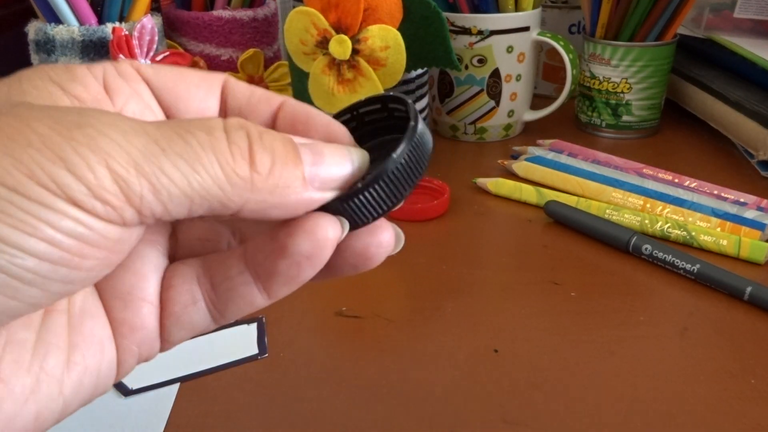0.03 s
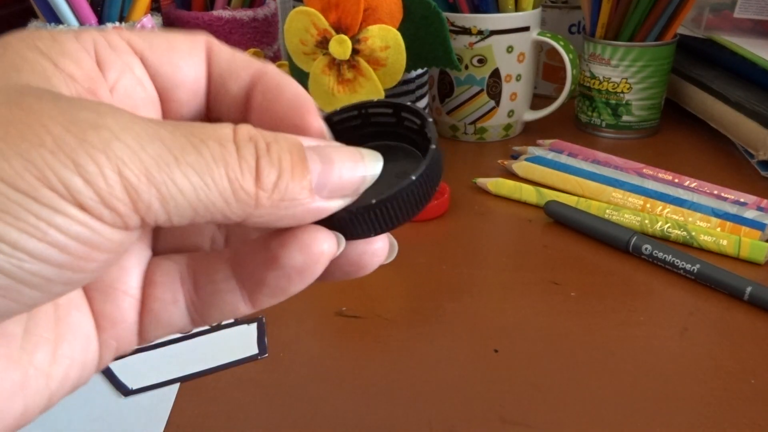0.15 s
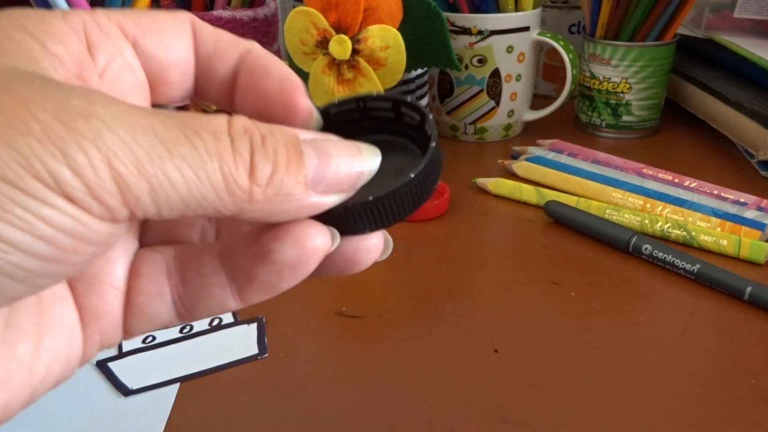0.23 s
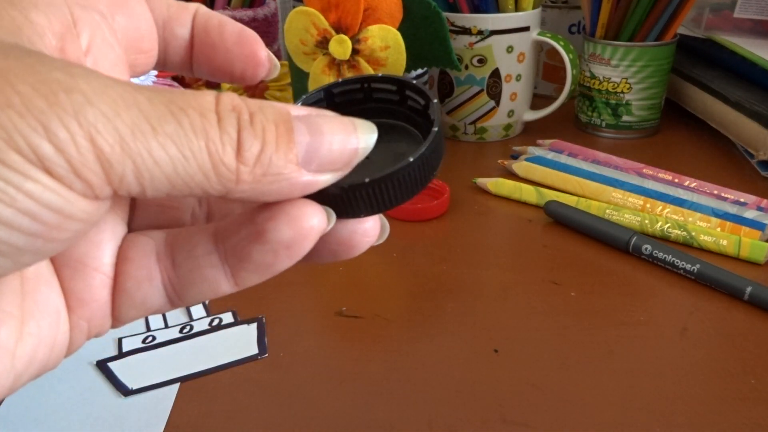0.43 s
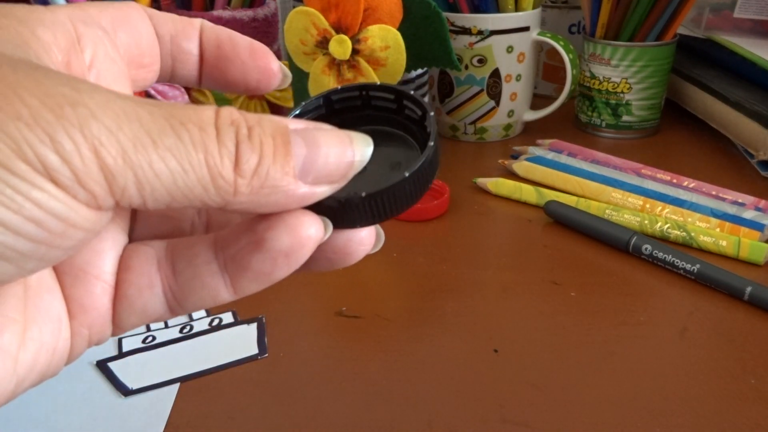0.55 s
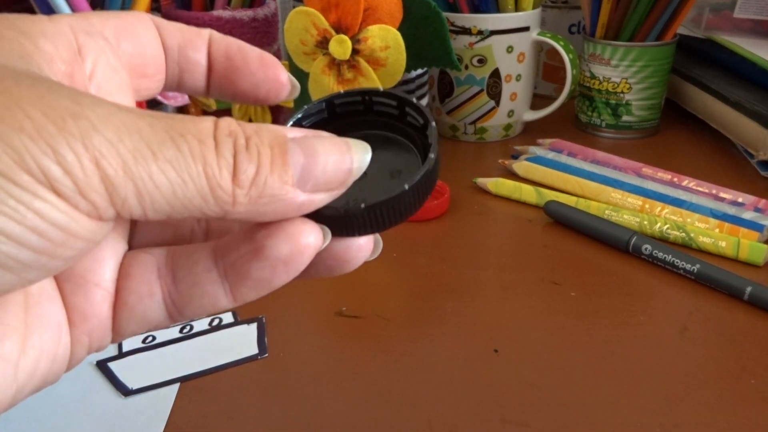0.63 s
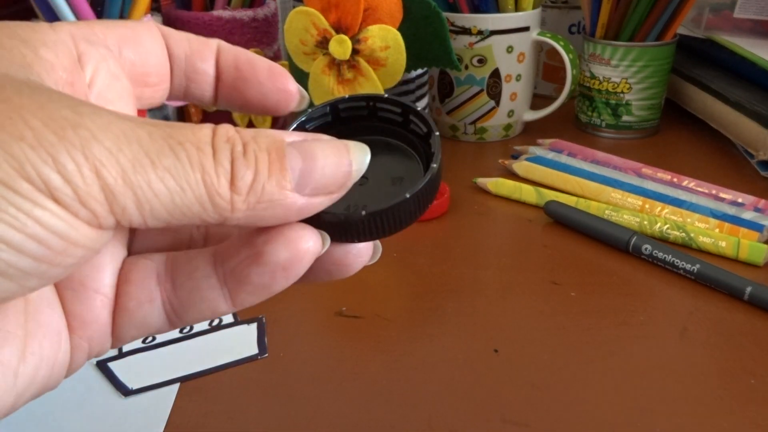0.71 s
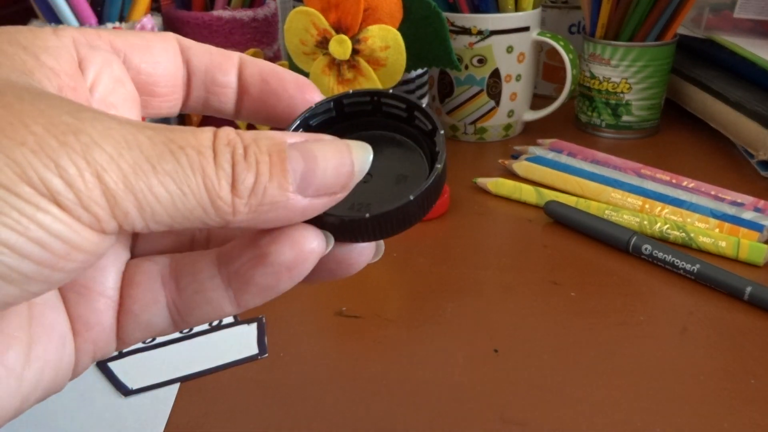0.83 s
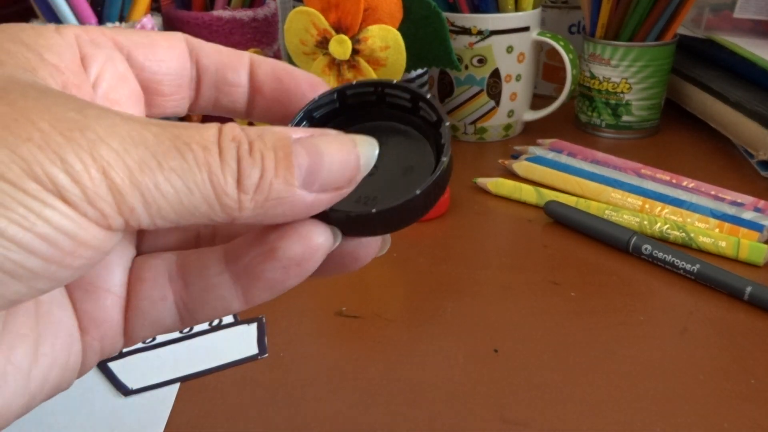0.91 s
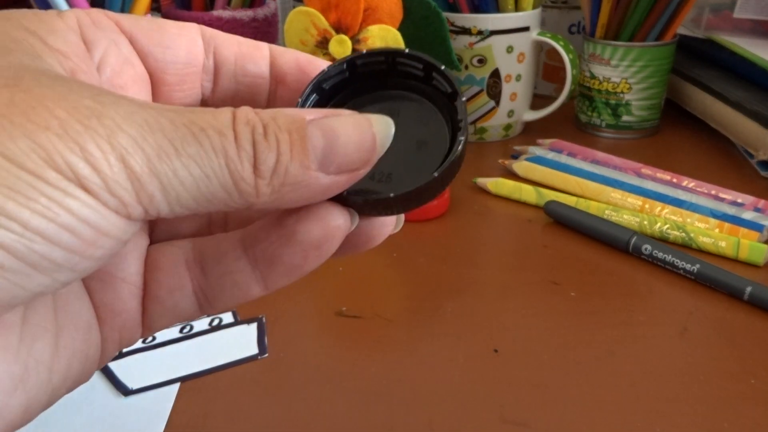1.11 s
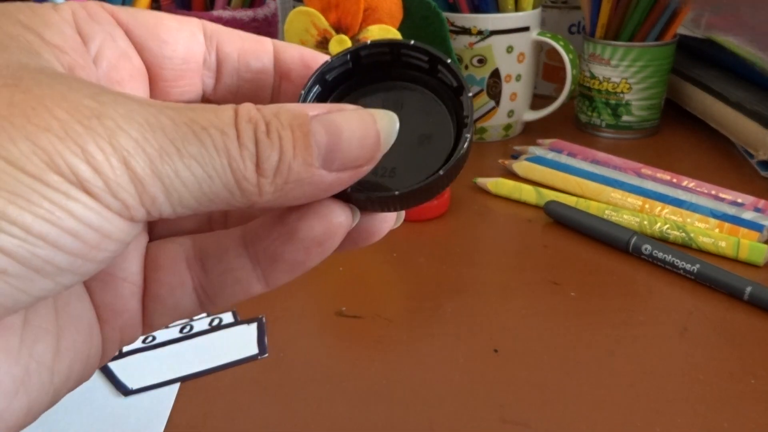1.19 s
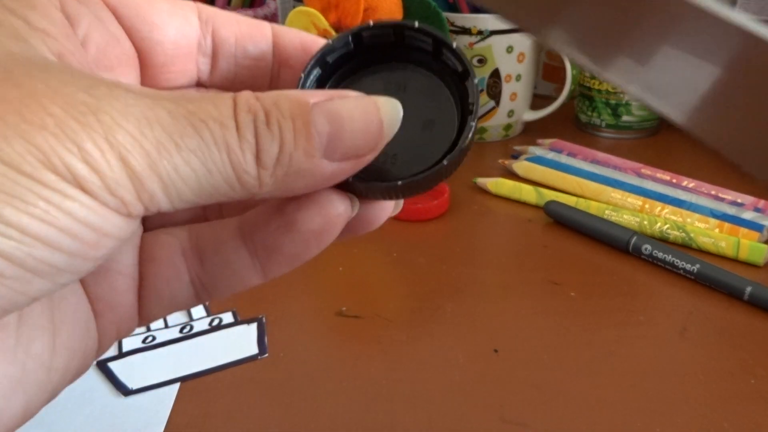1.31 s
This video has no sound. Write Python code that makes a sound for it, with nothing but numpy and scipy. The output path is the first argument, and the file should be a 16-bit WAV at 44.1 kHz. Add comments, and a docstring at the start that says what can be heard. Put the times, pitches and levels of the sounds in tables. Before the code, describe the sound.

Close up in a small quiet room, fingers brush plastic, caps click together and rattle with growing force, knock hollowly on a wooden desktop, then settle, leaving low hiss and a faint rub.

```python
"""Plastic bottle caps are picked from a heap on a wooden desk, tick against each other and tumble back.
Each knock is a short rough push that rings desk and cap modes, with a smooth hollow note struck by one tap.
Random small contacts rattle under and between the knocks; fingers rub softly (shaped noise), the desk top
hums (wandering sine), a small room answers (decaying noise). Room hiss and a thin electrical whine lie underneath."""
import sys
import numpy as np
from scipy import signal
from scipy.fft import rfft, irfft
from scipy.io import wavfile
from scipy.ndimage import uniform_filter1d

SR = 44100
rng = np.random.default_rng(int(sys.argv[2]) if len(sys.argv) > 2 else 0)


def output_pcm(signal):
    """Save a mono or channel-first signal as 16-bit PCM at the path in sys.argv[1].

    Samples are clipped to [-1, 1] before scaling.
    """
    pcm = np.clip(np.atleast_2d(signal).T, -1, 1) * 32767
    wavfile.write(sys.argv[1], SR, np.round(pcm).astype(np.int16))


N = 59535
TIME_S = np.arange(N) / SR

# Steady hiss spectrum. Each row: frequency in Hz, relative density in dB per Hz.
HISS_TONE = [(24, -67), (40, -36.5), (180, -11.5), (330, -5), (800, 5), (1300, -3.5), (1580, 6.5),
             (1900, -4), (2440, 0), (3830, -11), (4460, -12), (8770, -9.5), (16000, -12.5)]
# Stereo likeness of the hiss. Each row: frequency in Hz, left-right correlation (-1 to 1).
HISS_LIKENESS = [(60, 0.12), (240, -0.19), (950, -0.56), (3770, 0.16), (15000, 0.95)]
# Finger rubs, one list per rub. Each row: time in seconds, level in dB.
RUB_LEVELS = [
    [(0, -47), (.022, -57.5), (.032, -55.5), (.075, -56), (.09, -75), (.122, -67), (.138, -53), (.155, -57),
     (.172, -46.5), (.195, -51.5), (.205, -68)],
    [(.935, -72), (.96, -54), (.985, -54.5), (1.015, -67), (1.045, -64), (1.072, -51.5), (1.1, -60),
     (1.125, -59.5), (1.155, -71.5), (1.21, -78), (1.24, -59.5), (1.265, -61), (1.295, -82)],
]
# Rub spectra, one list per rub. Each row: frequency in Hz, relative density in dB per Hz.
RUB_TONES = [
    [(1760, -38), (3000, -16), (6480, -14), (13800, 2.5), (16000, -2)],
    [(1760, -2), (3000, -1), (3520, -2.5), (11000, 2), (16000, -5.5)],
]
# Knocks. Each row: start in seconds, low, low-mid, high-mid and treble level in dB (energy over 5 ms,
# before the bass cut), contact decay in ms, ring share of the caps (0-1), pitch of the hollow note in Hz.
KNOCKS = [(0.0137, -89, -64, -78, -57, 0.2, 0, 864), (0.2, -38, -72, -61, -40, 2.4, 0.9, 870.0),
          (0.21, -59, -71, -68, -29, 2, 0, 990), (0.2376, -36.5, -51, -44.5, -38, 2.4, 0.93, 1086),
          (0.242, -32, -66, -41, -26, 2.6, 0.72, 955), (0.249, -40.5, -49.5, -42, -36.5, 1.1, 0.6, 1053),
          (0.2597, -61, -66.5, -72, -43, 3.7, 0.8, 1070), (0.345, -34.5, -42, -28.5, -27.5, 2, 0.84, 900),
          (0.354, -49, -51, -36, -49, 3.8, 0.92, 850), (0.3603, -43, -66.5, -38, -39, 1.6, 0.85, 1130),
          (0.373, -48, -44, -33.5, -59, 1.6, 0.84, 1240), (0.4264, -46.5, -51, -49.5, -51, 0.5, 0.7, 1020),
          (0.447, -64.5, -56, -52.5, -45, 1, 0.4, 1040), (0.4884, -35.5, -40, -33.5, -36, 2.4, 0.7, 926),
          (0.5, -35, -35, -39.5, -74, 4.6, 1, 1042), (0.529, -33.5, -57.5, -53, -57.5, 1.7, 0.4, 990),
          (0.539, -48, -51, -59.5, -51, 3.1, 0.5, 1053), (0.5716, -37, -40.5, -61.5, -70, 4.6, 0.6, 938),
          (0.5904, -29.5, -31.5, -25, -62, 1.3, 0.07, 1027), (0.592, -28, -27.5, -68, -46, 7, 0.01, 1029),
          (0.611, -30, -33.5, -46, -63, 1.4, 0.3, 1053), (0.6209, -35, -60, -34.5, -35, 0.87, 0.67, 900),
          (0.6312, -29.5, -42, -28, -41, 2.3, 0.04, 974), (0.635, -26, -20, -22.5, -46, 1.22, 0.12, 1080),
          (0.644, -24, -32.5, -35, -28.5, 2.2, 0.09, 958), (0.6804, -17, -26, -28, -63, 2.6, 0.37, 916),
          (0.689, -43.5, -31.5, -35, -32, 0.92, 0.16, 870),
          (0.7077, -17.5, -49.5, -58, -55, 1.2, 0.85, 917),
          (0.719, -26.5, -19.5, -31, -31.0, 3.24, 0, 1053), (0.7233, -21, -23.5, -40.5, -67.5, 1.3, 0, 906),
          (0.772, -28.5, -39, -43.5, -72, 1.4, 0.6, 922), (0.7807, -33, -40, -62, -72, 2.9, 0.4, 1066),
          (0.788, -36, -45, -73, -77, 1.4, 0, 925), (0.812, -37, -75, -66, -76, 1.9, 0.2, 995),
          (0.828, -37.5, -59.5, -61.5, -77, 1.9, 0.4, 890), (0.873, -42.5, -59, -69.5, -69, 1.7, 0.5, 940),
          (0.906, -46, -57, -72.5, -76, 3.7, 0.1, 942)]
# Edges between the four bands, in Hz.
BAND_EDGES_HZ = [1400, 3000, 7000]
# Modes of desk and caps. Each row: frequency in Hz, level in dB relative within its band, t60 in seconds.
MODES = [(258.4, -26.5, 0.039), (363, -8, 0.052), (542, 3.5, 0.068), (627, 6, 0.098), (850, -14.5, 0.058),
         (1156, 6, 0.04), (1715, 5.5, 0.0089), (1840, 2.5, 0.04), (2455, -1.5, 0.034), (2720, 6.5, 0.0085),
         (3380, -15, 0.034), (3510, 11, 0.033), (4845, -6, 0.02), (5240, -8.5, 0.028), (6110, 5.5, 0.038),
         (6920, 5.5, 0.0079), (7580, 7, 0.0073), (8880, 8.5, 0.032), (9730, 10, 0.021), (12200, 5, 0.026),
         (13350, 16.5, 0.0062), (15000, 11.5, 0.03)]
# Upper limit on the mode t60 in each band, in seconds.
LONGEST_T60_S = [.045, .03, .024, .02]
# Room decay. Each row: frequency in Hz, t60 in seconds.
ROOM_T60 = [(200, 0.87), (500, 0.72), (1000, 0.3), (3700, 0.19), (9700, 0.22)]
# Desk panel's deep hum. Each row: time in seconds, RMS level in dB.
BOOM_LEVEL = [(0.19, -100), (0.21, -77), (0.25, -65), (0.3, -59.5), (0.34, -78), (0.38, -80), (0.42, -92),
              (0.57, -103), (0.6, -68.5), (0.65, -75), (0.7, -51.5), (0.74, -77), (0.77, -80),
              (0.82, -67.5), (0.86, -95), (0.9, -89)]
# Rattle of small contacts. Each row: time in seconds, then low, low-mid, high-mid and treble level in dB,
# all before the trim and the bass cut.
RATTLE_LEVELS = [(0.195, -73, -52, -57, -56), (0.203, -45, -60.0, -51, -67),
                 (0.236, -51.5, -67, -65, -66.5), (0.25, -35, -48.5, -44, -46.5),
                 (0.3, -99, -59, -60.5, -50.5), (0.342, -106, -65, -56.5, -62.5),
                 (0.35, -41.5, -58, -50, -33.5), (0.395, -62, -46, -43, -38.5),
                 (0.412, -52.5, -60, -61, -57), (0.44, -43.5, -55.5, -50.5, -48.5),
                 (0.465, -43.5, -36.5, -39, -38), (0.483, -40.5, -41, -57, -48),
                 (0.505, -47.5, -40, -36.5, -44.5), (0.525, -39.5, -70, -56, -52.5),
                 (0.555, -37, -59, -60, -62), (0.588, -40, -47, -57, -57.5),
                 (0.596, -41.5, -42, -40, -48.5), (0.627, -30, -29.5, -46, -54.5),
                 (0.64, -34.5, -25.5, -28, -28.5), (0.672, -29.5, -24, -31.5, -33.5),
                 (0.7, -49, -22.5, -35, -46.5), (0.735, -30, -29, -36.5, -45),
                 (0.755, -43, -28.5, -48, -45), (0.8, -53, -39.5, -51.5, -57),
                 (0.85, -54.5, -50.5, -61, -70.5), (0.9, -66.5, -56, -65, -73),
                 (0.93, -78, -57, -69, -73.5)]
# Caps ring freely in the hand, less in the heap. Each row: time in seconds, ring share (0-1).
RATTLE_RING = [(.52, .35), (.6, .05)]
# Where the heap sounds. Each row: time in seconds, left-right level difference in dB.
PAN = [(.3, -1.7), (.5, -2.7), (.7, -1.3), (0.901, 0.5)]

HISS_DB, WHINE_HZ, WHINE_PEAK_DB = -60, 15625, -79
RUB_LEAN_DB = -2  # left minus right
CRACK_LOW_HZ, CRACK_TOP_HZ = 570, 12260
CRACK_OVERLAP = 1.15  # each band's crack reaches into the next
CRACK_DULL_HZ = 1150  # above it the dry crack falls 6 dB an octave
CONTACT_RISE_S, DESK_RING_SHARE = 0.00028, 0.46
HOLLOW_SHARE = 0.68  # air in the cupped cap; its pitch follows how the cap lies
KNOCK_HOLLOW_WIDTH_HZ, RATTLE_HOLLOW_WIDTH_HZ = 115, 48
ROOM_DB, ROOM_LIKENESS, ROOM_DELAY_S = -10.5, 0.45, 0.004
BOOM_HZ, BOOM_WANDER_RMS_HZ = 109, 2.15
RATTLES_PER_S, RATTLE_SPREAD_DB, RATTLE_TRIM_DB = 3000, 2, -4.5
BASS_CUT_HZ, BAND_LIMIT_HZ = 278.5, 16000


def amp(db):
    """Decibels to amplitude factor."""
    return 10 ** (np.asarray(db) / 20)


def evened(x):
    """Scale to RMS 1."""
    return x / np.sqrt(np.mean(x ** 2) + 1e-20)


def read(points, hz):
    """Interpolate a frequency table on a log axis."""
    f, value = np.transpose(points)
    return np.interp(np.log(hz + 1), np.log(f + 1), value)


def over_time(points):
    """Interpolate a two-column time table at every sample."""
    return np.interp(TIME_S, *np.transpose(points))


def curve(table, column=1, off_db=-120):
    """Amplitude envelope from a dB column, at off_db outside the table's times."""
    rows = np.array(table)
    return amp(np.interp(TIME_S, rows[:, 0], rows[:, column], off_db, off_db))


def lean(db):
    """Left and right gains that differ by db."""
    return amp(np.array([[.5], [-.5]]) * db)


def blend(share, a, b):
    """Mix two signals by energy share."""
    share = np.clip(share, 0, 1)
    return np.sqrt(share) * a + np.sqrt(1 - share) * b


def correlated(a, b, likeness):
    """Two channels whose correlation is likeness, from independent a and b."""
    return np.array([a, likeness * a + np.sqrt(1 - likeness ** 2) * b])


def noise(tone, likeness):
    """Two-channel noise with the given spectrum and left-right likeness."""
    hz = np.fft.rfftfreq(N, 1 / SR)
    a, b = rfft(rng.standard_normal((2, N)))
    pair = correlated(a, b, np.clip(likeness(hz), -1, 1))
    return evened(irfft(pair * amp(read(tone, hz)), N))


def hiss_and_whine():
    """Room hiss as shaped noise, and a thin electrical whine as a steady sine."""
    whine = amp(WHINE_PEAK_DB) * np.sin(2 * np.pi * WHINE_HZ * TIME_S)
    return amp(HISS_DB) * noise(HISS_TONE, lambda hz: read(HISS_LIKENESS, hz)) + whine


def finger_rubs():
    """Skin sliding on plastic: soft treble hiss, alike in both channels."""
    rubs = [curve(level) * noise(tone, np.ones_like) for level, tone in zip(RUB_LEVELS, RUB_TONES)]
    return sum(rubs) * lean(RUB_LEAN_DB)


def hollow(push, hz, width_hz):
    """A resonance that follows the pitch hz; keeps the energy of white noise."""
    turn = np.exp(2j * np.pi * np.cumsum(hz * np.ones(len(push))) / SR)
    r = np.exp(-np.pi * width_hz / SR)
    # one-pole filter on the push shifted down by the pitch, then shifted back up
    ringing = turn * signal.lfilter([1], [1, -r], push / turn)
    return np.sqrt(2 * (1 - r * r)) * ringing.real


def bodies():
    """Per band: the decaying ring of its modes and a dry crack, each of energy 1."""
    t = np.arange(8192) / SR
    edges = [0, *BAND_EDGES_HZ, SR / 2]
    out = []
    for lo, hi, longest in zip(edges, edges[1:], LONGEST_T60_S):
        ring = sum(amp(db - 60 * t / min(t60, longest)) * np.sin(2 * np.pi * hz * t)
                   for hz, db, t60 in MODES if lo <= hz < hi)
        crack_band_hz = [max(lo, CRACK_LOW_HZ), min(hi * CRACK_OVERLAP, CRACK_TOP_HZ)]
        band = signal.butter(2, crack_band_hz, "band", fs=SR, output="sos")
        sign = (-1) ** len(out)  # neighbours add up at their edge
        crack = sign * signal.sosfilt(band, np.exp(-2 * np.pi * CRACK_DULL_HZ * t))
        out.append([ring / np.linalg.norm(ring), crack / np.linalg.norm(crack)])
    return out


def knocks(body):
    """Each knock: a short rough push into desk and cap modes, plus a hollow note started by one clean tap."""
    out = np.zeros(N + 9300)
    t = np.arange(1024) / SR
    grits = rng.standard_normal((len(KNOCKS), 1024))
    for (start_s, *levels_db, contact_ms, ring_share, hz), grit in zip(KNOCKS, grits):
        decay = np.exp(-t / (max(contact_ms, .05) / 1000))
        push = (np.sign(grit) + .5 * grit) * decay * np.minimum(t / CONTACT_RISE_S, 1)
        shares = [DESK_RING_SHARE, ring_share, ring_share, ring_share]
        parts = [evened(signal.fftconvolve(push, blend(share, ring, crack)))
                 for share, (ring, crack) in zip(shares, body)]
        note = np.zeros(len(parts[0]))
        note[0] = 1
        for _ in range(2):  # two resonances in series: swells, then dies
            note = hollow(note, hz, KNOCK_HOLLOW_WIDTH_HZ)
        parts[0] = evened(blend(HOLLOW_SHARE, evened(note), parts[0]))
        sound = sum(amp(db) * part for db, part in zip(levels_db, parts))
        sound *= np.sqrt(.005 * SR / len(parts[0]))  # levels count as energy over 5 ms
        out[round(start_s * SR):][:len(sound)] += sound
    return out[:N]


def room(x):
    """Delayed noise tail, each frequency dying at its own speed."""
    a, b = rng.standard_normal((2, SR)) * (np.arange(SR) > ROOM_DELAY_S * SR)
    hz, t, spectrum = signal.stft(correlated(a, b, ROOM_LIKENESS), SR, nperseg=256)
    decay = amp(-60 * t / read(ROOM_T60, hz)[:, None])
    tail = signal.istft(spectrum * decay, SR, nperseg=256)[1]
    return signal.fftconvolve(x[None], tail / np.linalg.norm(tail[0]), axes=1)[:, :N]


def desk_boom():
    """Deep, slightly fuzzy hum of the desk top: a sine whose pitch wanders."""
    wander = evened(uniform_filter1d(rng.standard_normal(N), 2000))
    phase = 2 * np.pi * np.cumsum(BOOM_HZ + BOOM_WANDER_RMS_HZ * wander) / SR
    return curve(BOOM_LEVEL) * np.sqrt(2) * np.sin(phase)


def rattle(body):
    """Many small random contacts ring the same modes and the hollow."""
    strength = amp(RATTLE_SPREAD_DB * np.minimum(rng.exponential(1, N), 4))
    hits = rng.random(N) < RATTLES_PER_S / SR
    taps = evened(strength * hits * rng.choice([-1, 1], N))
    cap_share = over_time(RATTLE_RING)
    pushes = [taps * curve(RATTLE_LEVELS, column=k + 1) for k in range(len(body))]
    parts = []
    for k, push in enumerate(pushes):
        ring, crack = [signal.oaconvolve(push, response)[:N] for response in body[k]]
        parts.append(blend(cap_share if k else DESK_RING_SHARE, ring, crack))
    rows = np.array(KNOCKS)
    pitch_hz = np.interp(TIME_S, rows[:, 0], rows[:, -1])  # glides between the knocks' notes
    parts[0] = blend(HOLLOW_SHARE, hollow(pushes[0], pitch_hz, RATTLE_HOLLOW_WIDTH_HZ), parts[0])
    return amp(RATTLE_TRIM_DB) * sum(parts)


def scene():
    """Caps and their room share one pan; hum, rubs, hiss and whine are added."""
    body = bodies()
    bass_cut = signal.butter(4, BASS_CUT_HZ, "high", fs=SR, output="sos")
    caps = signal.sosfilt(bass_cut, knocks(body) + rattle(body))
    caps_in_room = (caps + amp(ROOM_DB) * room(caps)) * lean(over_time(PAN))
    return caps_in_room + desk_boom() + finger_rubs() + hiss_and_whine()


def record(dry):
    """Band limit: a steep linear-phase low-pass."""
    lowpass = signal.firwin(511, BAND_LIMIT_HZ, window=("kaiser", 9), fs=SR)
    return signal.oaconvolve(dry, lowpass[None], "same")


dry = scene()
out = record(dry)
output_pcm(out)
```